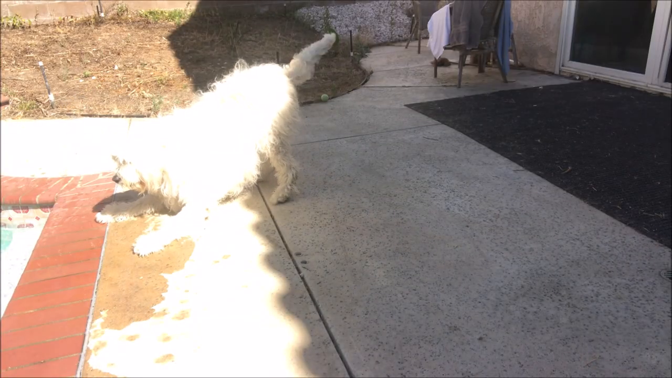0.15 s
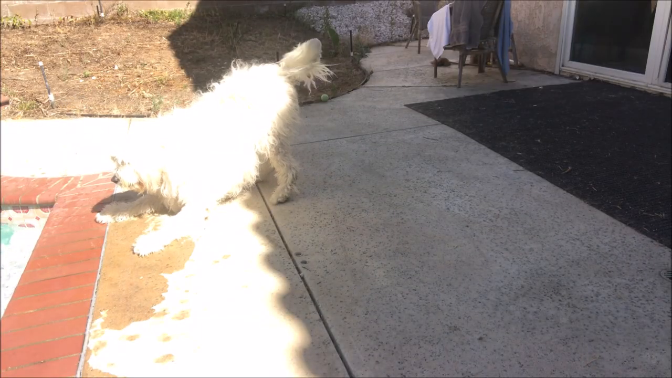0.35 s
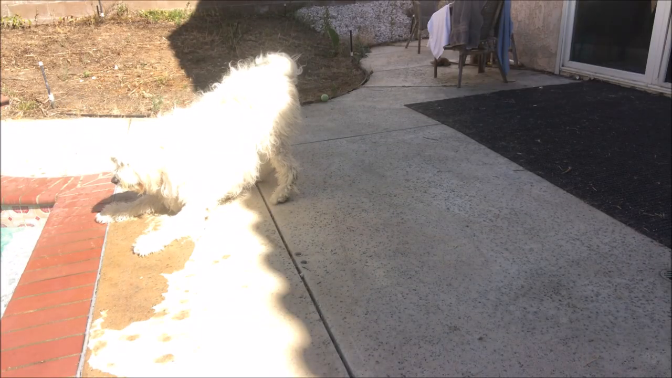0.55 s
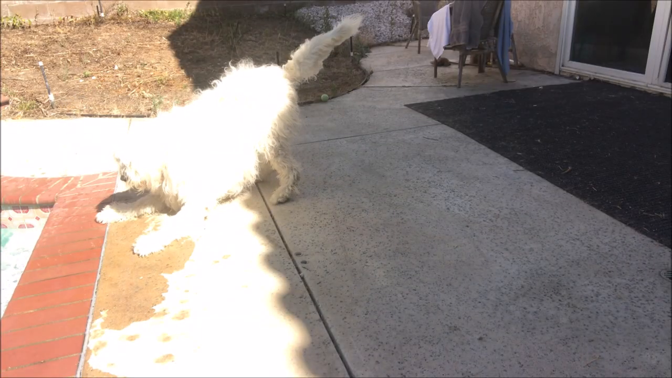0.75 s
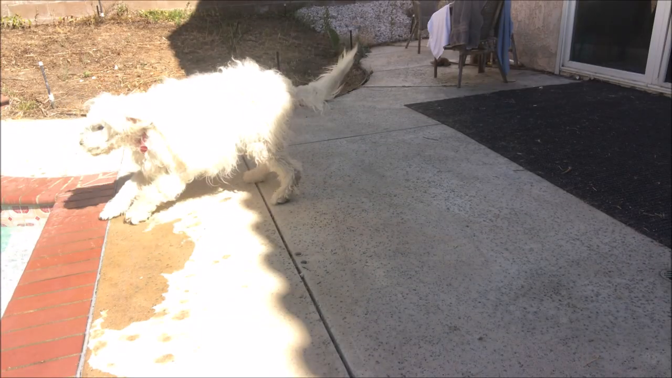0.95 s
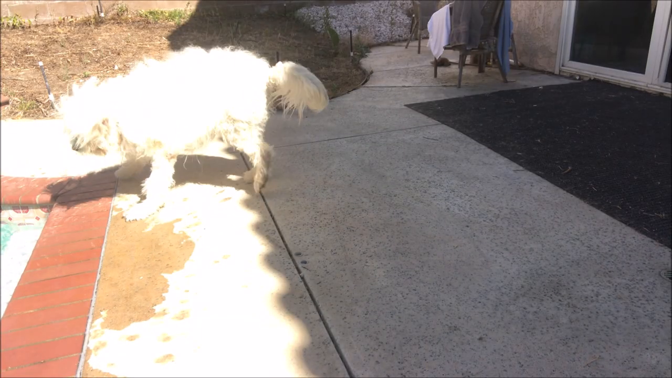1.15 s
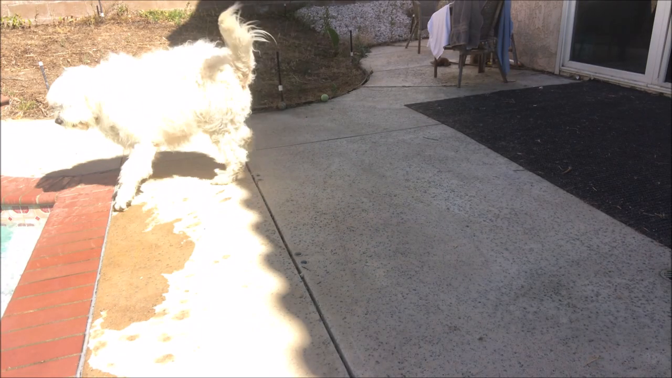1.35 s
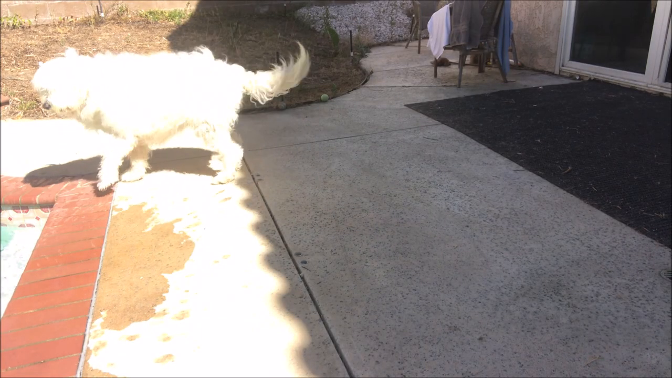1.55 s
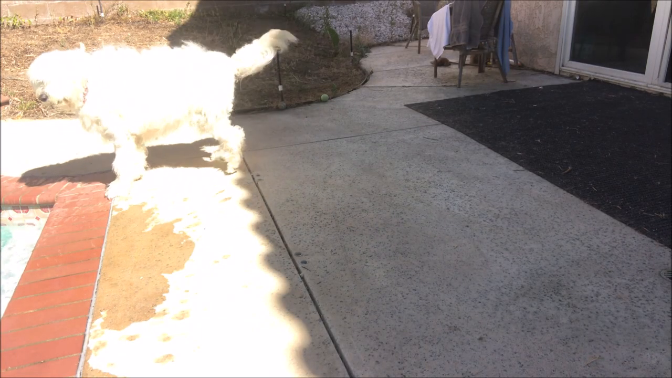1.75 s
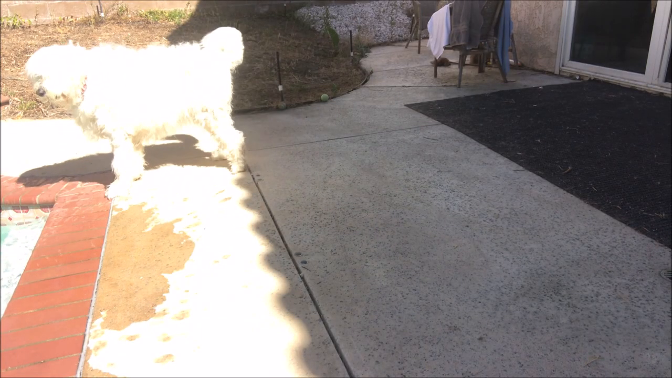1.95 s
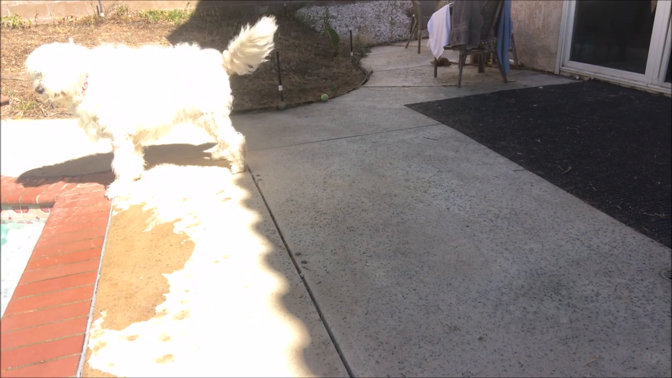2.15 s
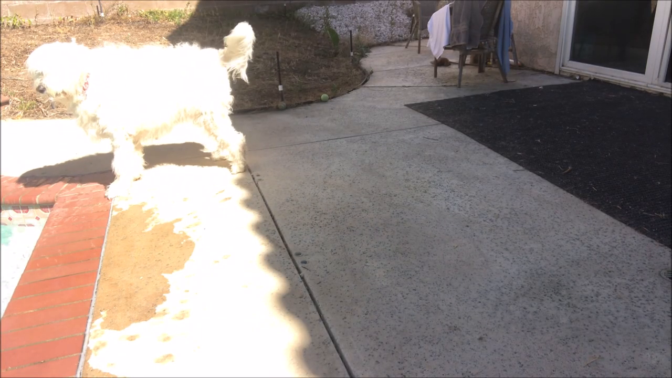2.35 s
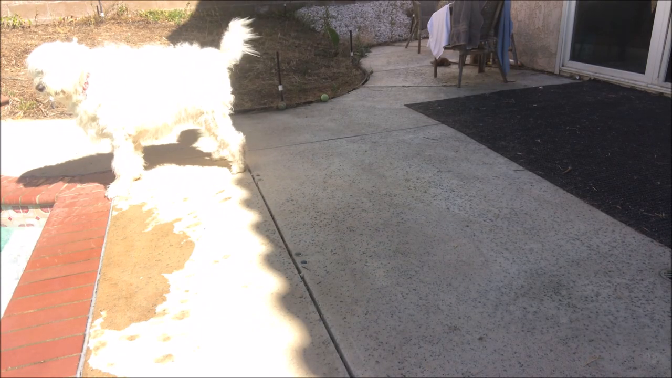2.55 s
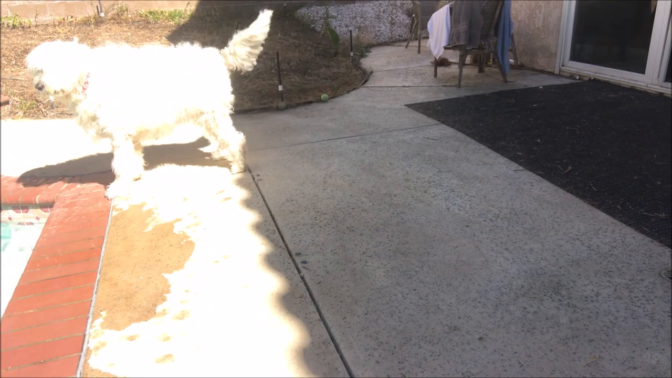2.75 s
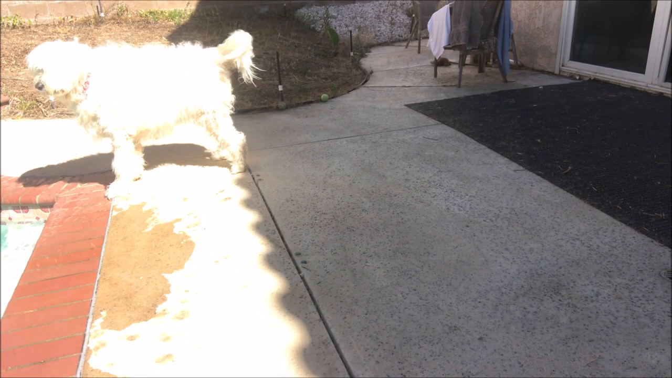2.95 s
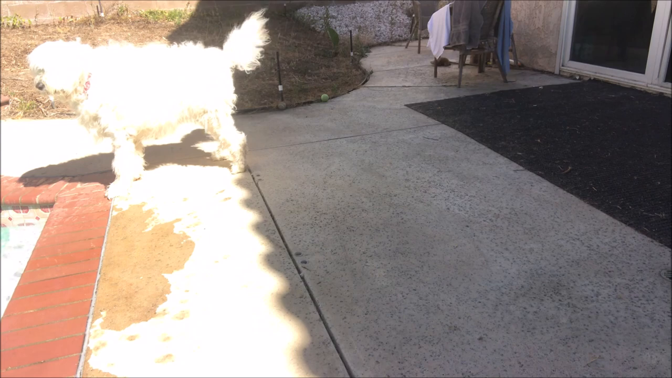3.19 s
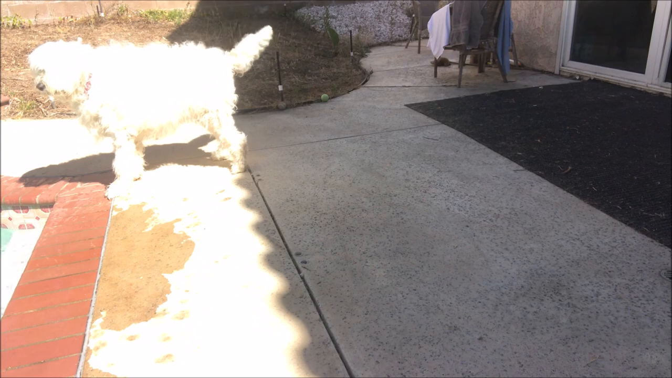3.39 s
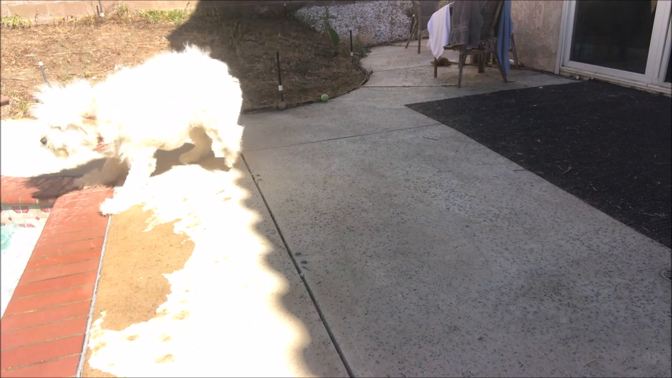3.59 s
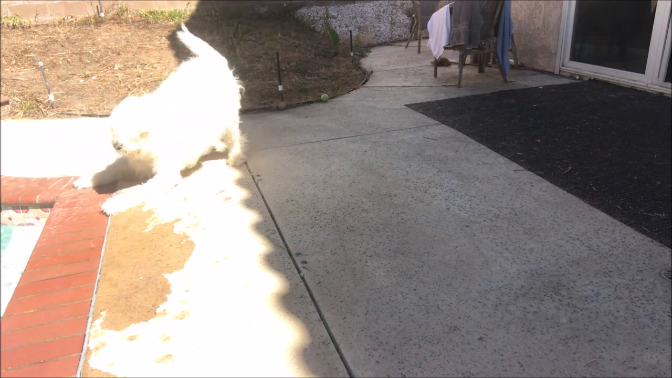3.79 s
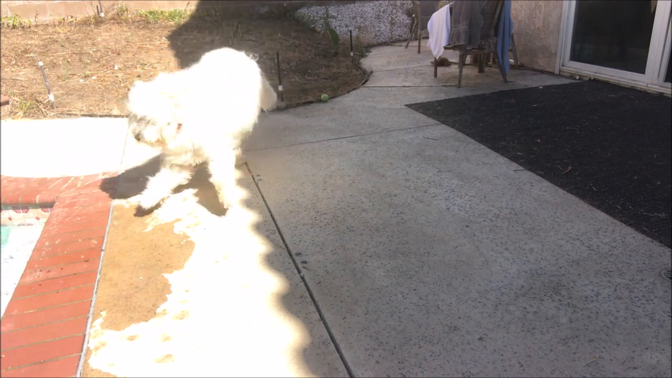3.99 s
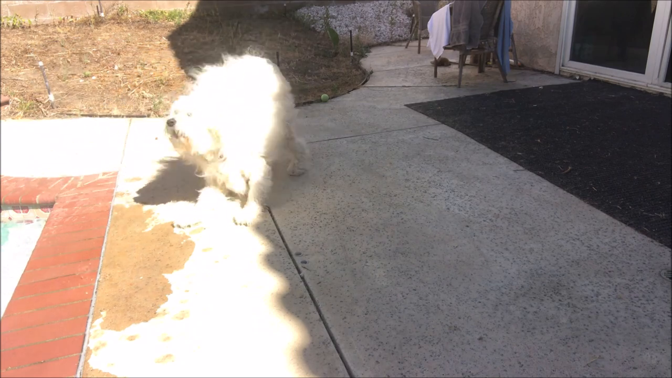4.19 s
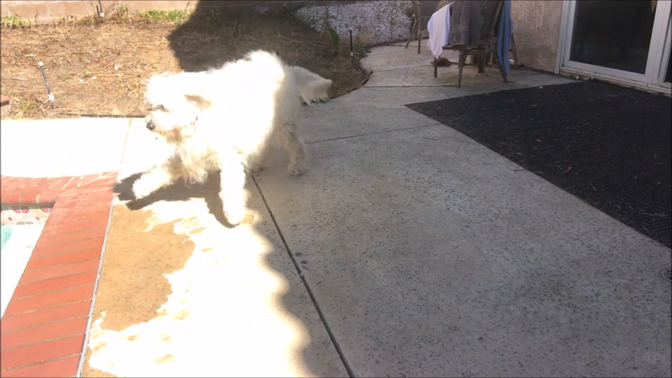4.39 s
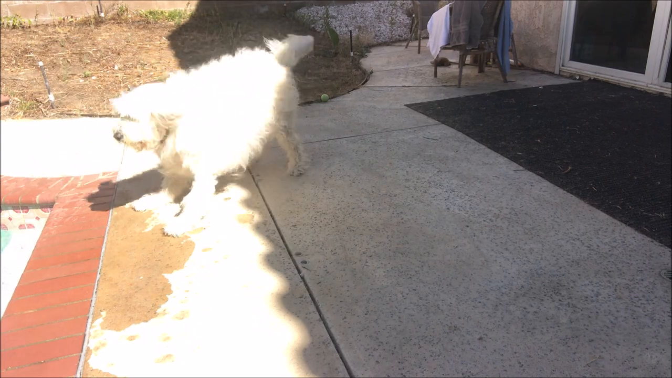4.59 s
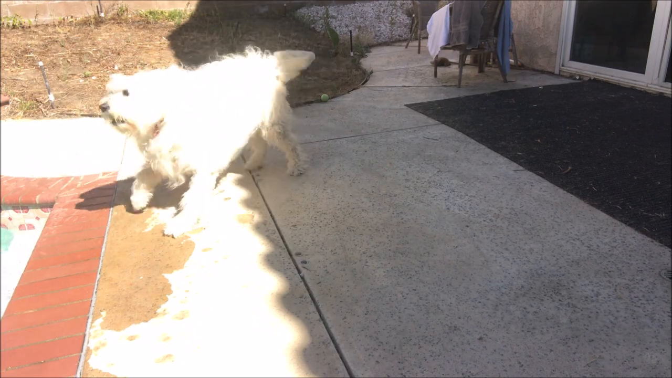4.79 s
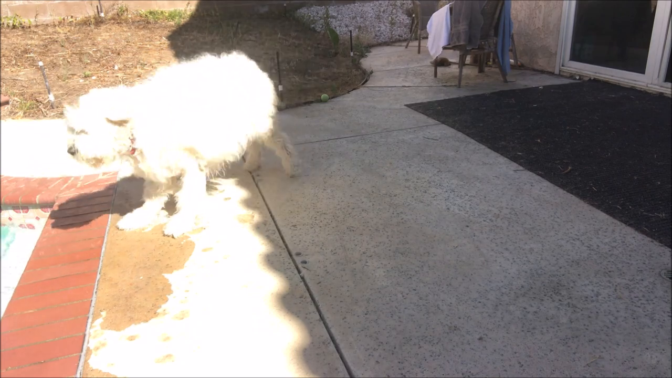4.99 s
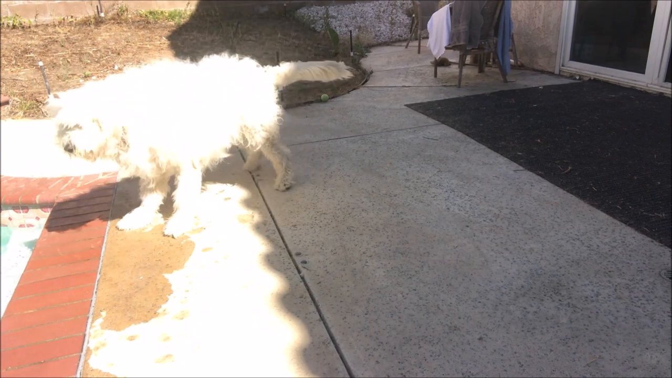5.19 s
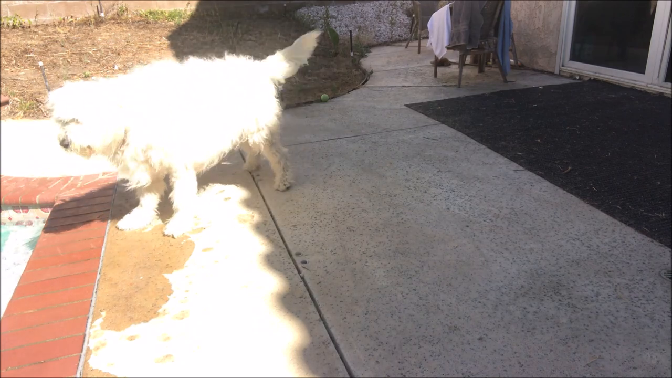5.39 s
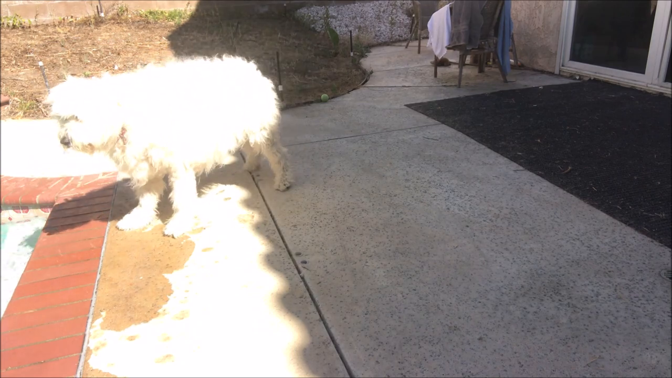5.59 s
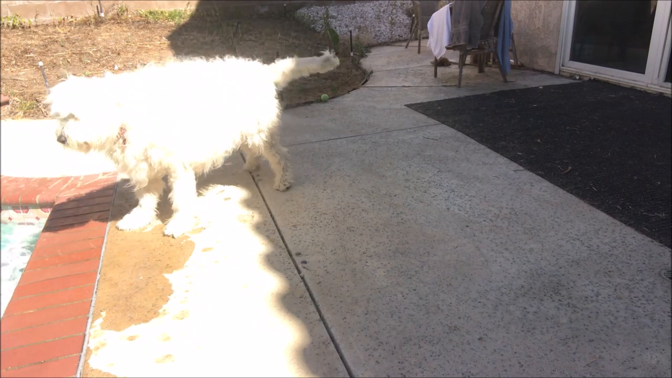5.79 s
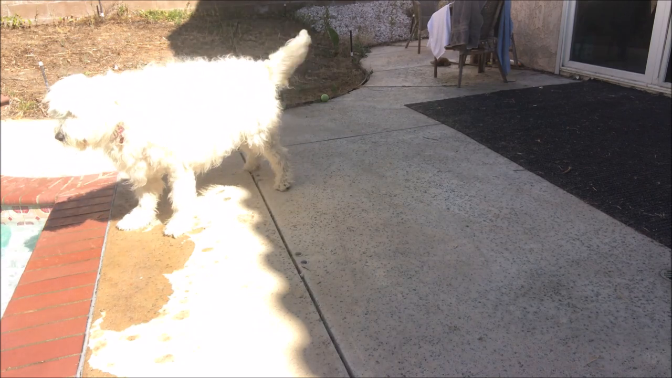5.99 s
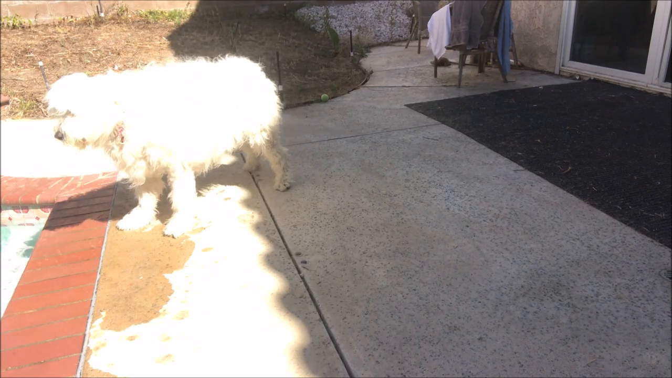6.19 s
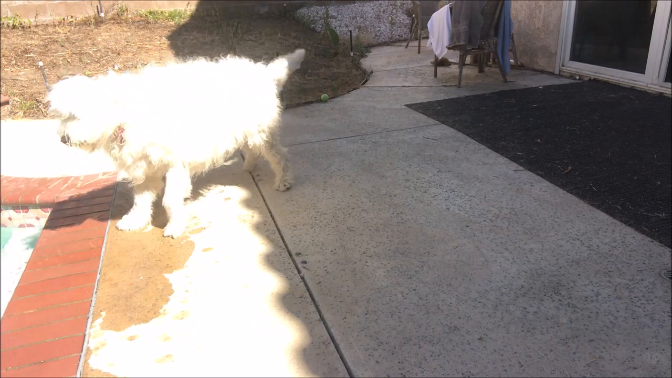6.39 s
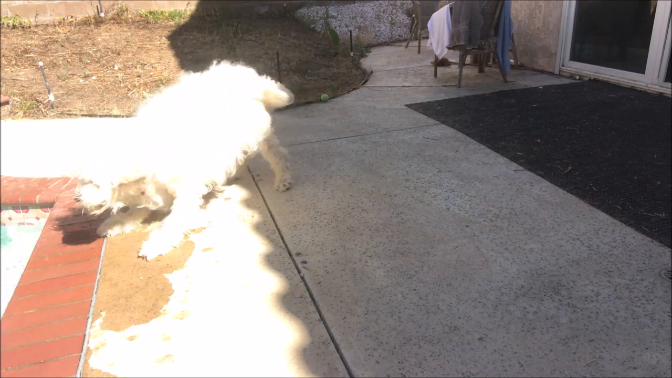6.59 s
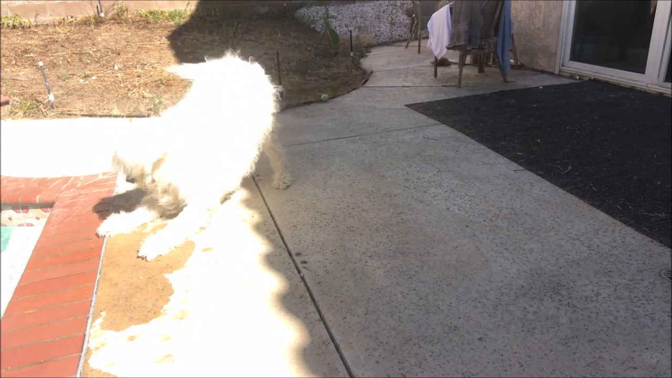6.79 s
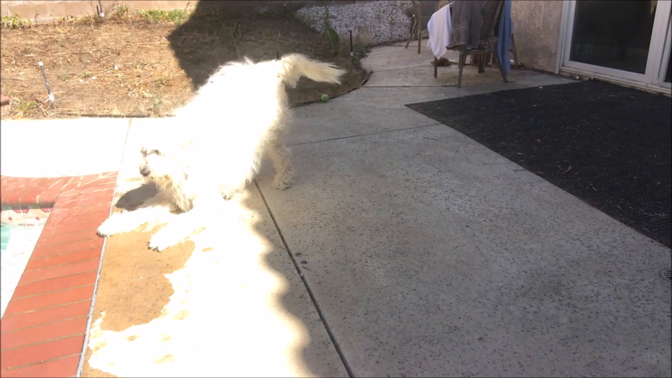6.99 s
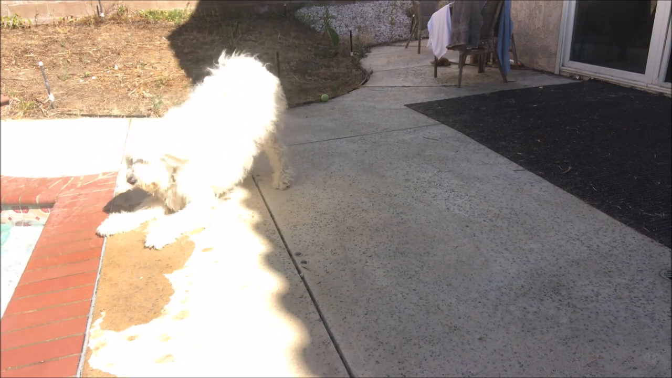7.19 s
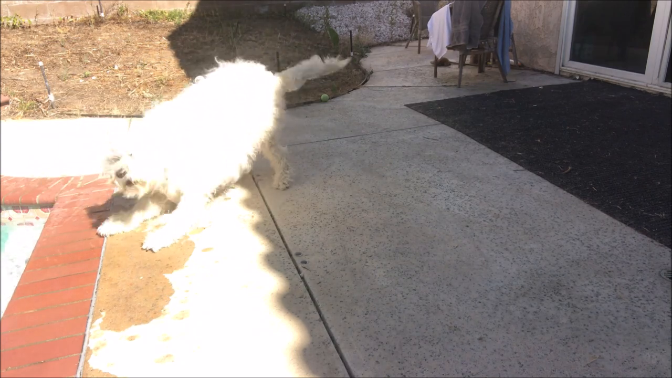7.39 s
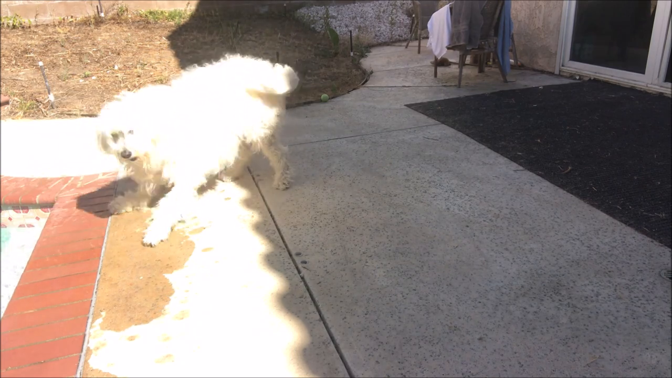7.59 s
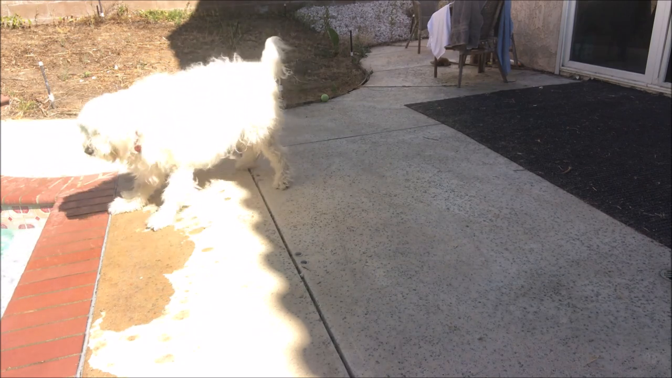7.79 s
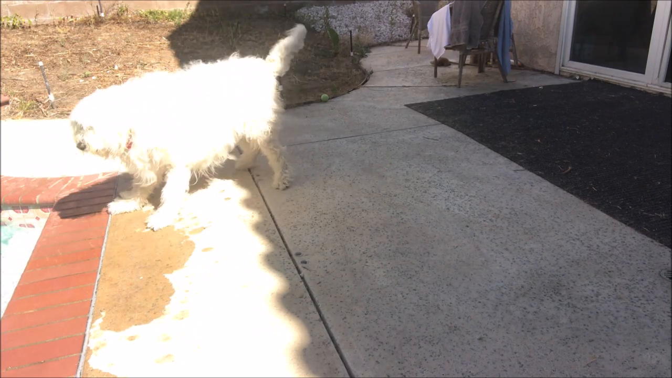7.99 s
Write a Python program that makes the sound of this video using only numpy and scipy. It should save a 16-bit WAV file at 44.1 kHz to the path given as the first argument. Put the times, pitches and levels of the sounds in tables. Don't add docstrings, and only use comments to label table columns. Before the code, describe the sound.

Water laps and fizzes at a pool edge with small drips, then a large dog gives one sharp bark and a breathy huff. After a pause come three barks in a quick run, over a bigger slosh with gurgles and plops. Two more separate barks follow, with a rough growling intake of breath between them. The microphone is outdoors near the dog; house walls return short echoes over faint wind and distant hiss.

```python
import sys
import numpy as np
from scipy import signal
from scipy.fft import rfft, irfft, next_fast_len
from scipy.io import wavfile
from scipy.ndimage import uniform_filter1d, map_coordinates

SR = 44100
rng = np.random.default_rng(int(sys.argv[2]) if len(sys.argv) > 2 else 0)


def undo_db(level):
    steps = np.asarray(level, float) / 20
    return 10 ** steps


def put_to_file(sound):
    columns = np.atleast_2d(sound).T
    safe = np.clip(columns, -1, 1)
    whole_steps = np.round(safe * 32767)
    wavfile.write(sys.argv[1], SR, whole_steps.astype(np.int16))


N = 354999
T = np.arange(N) / SR


def unit(x):
    return x / np.sqrt(np.mean(x ** 2) + 1e-20)


def along(points, hz):
    f, v = np.transpose(points)
    return np.interp(np.log(hz + 1), np.log(f + 1), v)


def curves(rows, t=T):
    s, *cols = np.transpose(rows)
    return [np.interp(t, s, c) for c in cols]


def wobble(rate, size=N):
    knots = rng.standard_normal(int(size * rate / SR) + 4)
    return map_coordinates(knots, [np.arange(size) * rate / SR])


def filtered(x, response):
    m = next_fast_len(len(x) + 8192)
    hz = np.fft.rfftfreq(m, 1 / SR)
    return irfft(rfft(x, m) * response(hz), m)[:len(x)]


def noise(spectrum, size=N):
    return unit(filtered(rng.standard_normal(size), lambda hz: undo_db(along(spectrum, hz))))


def resonance(x, hz, width_hz, hold_s=0.014):
    turn = np.exp(2j * np.pi * np.cumsum(hz) / SR)
    pole = np.exp(-np.pi * width_hz / SR)
    y = np.real(signal.lfilter([1], np.poly([pole, pole, pole]), x / turn) * turn)
    return y / np.sqrt(np.abs(uniform_filter1d(y ** 2, int(hold_s * SR))) + 1e-12)


def fade(t, in_s, out_s):
    rising = np.clip((t - t[0]) / in_s, 0, 1)
    return rising * np.clip((t[-1] - t) / out_s, 0, 1)


def add(track, s, x):
    part = track[round(s * SR):][:len(x)]
    part += x[:len(part)]


def dog():
    # time in seconds, pitch in Hz.
    pitches = [
        [(.97, 305), (.99, 427.2), (1.01, 447.9), (1.035, 388), (1.06, 428), (1.135, 320.4)],
        [(3.615, 140.6), (3.68, 356.5), (3.75, 379), (3.805, 360)],
        [(4.25, 143.8), (4.295, 308.2), (4.325, 357.1), (4.365, 380.6), (4.39, 359.3), (4.43, 365)],
        [(4.835, 117.3), (4.91, 311.2), (4.94, 311.4), (4.965, 388.2), (4.99, 404.6), (5.045, 309)],
        [(6.545, 142.2), (6.57, 293.8), (6.59, 350.9), (6.635, 388.6), (6.685, 384.2), (6.7, 312), (6.725, 335)],
        [(7.36, 140.3), (7.41, 327.8), (7.465, 401.7), (7.5, 410.4), (7.52, 347), (7.55, 297)],
    ]
    # time in seconds, effort in dB.
    efforts = [
        [(.97, -51.5), (.99, -23), (1.01, -8.5), (1.035, -11.5), (1.06, -10.5), (1.085, -24), (1.135, -26)],
        [(3.615, -56.5), (3.645, -21), (3.68, -13), (3.7, -11), (3.725, -11.5), (3.75, -26), (3.805, -20)],
        [(4.25, -40.5), (4.275, -22), (4.295, -11), (4.325, -9), (4.35, -13), (4.365, -9), (4.39, -19.5),
         (4.43, -36)],
        [(4.835, -57), (4.87, -27.5), (4.91, -10.5), (4.95, -11.5), (4.99, -7), (5.015, -21), (5.045, -34)],
        [(6.545, -52), (6.57, -20), (6.59, -6.5), (6.635, -10.5), (6.66, -13), (6.672, -20), (6.685, -10),
         (6.7, -30), (6.725, -42.5)],
        [(7.36, -50.5), (7.395, -23.5), (7.41, -12.5), (7.445, -11), (7.465, -9.5), (7.48, -16.5), (7.5, -11),
         (7.52, -23.5), (7.55, -22.5)],
    ]
    # time in seconds, mouth over throat in dB.
    tongues = [
        [(.99, -4), (1.01, -11), (1.035, -4), (1.135, 0)],
        [(3.62, -19.5), (3.645, 3.5), (3.68, -1.5), (3.725, 14.5), (3.805, -31.5)],
        [(4.25, 10.5), (4.295, -6), (4.325, 6.5), (4.35, -7), (4.365, 9.5), (4.39, -4.5)],
        [(4.87, -10), (4.91, -10.5), (4.95, -5), (4.99, -18.5), (5.015, -3)],
        [(6.59, -16.5), (6.635, -5), (6.66, -1), (6.68, 21.5), (6.7, -22.5)],
        [(7.395, 9.5), (7.41, 5), (7.445, 10), (7.465, -0.5), (7.485, 10), (7.5, 9), (7.52, -20), (7.55, 8.5)],
    ]
    # fullest moment in seconds, level in dB,
    # catch in seconds, its depth in dB, its half length in seconds.
    chests = [(1.01, -12, 1.035, 4.5, 0.02), (3.725, -15.5, 3.69, 1.5, .02),
              (4.331, -13.5, 4.36, 11.5, 0.01), (4.958, -15, 4.91, 7.5, 0.017),
              (6.647, -13.5, 6.67, 25.5, 0.014), (7.466, -8.5, 7.49, 36.5, .02)]
    # half shut in seconds, throat shut in Hz, mouth wide in Hz,
    # muzzle wide in Hz, muzzle shut in Hz.
    jaws = [(1.02, 925, 1370, 2305, 1990), (3.73, 837, 1231, 2300, 1757), (4.321, 875, 1260, 2280, 1943),
            (4.963, 752, 1592, 2373, 2220), (6.614, 864, 1190, 1800, 2284), (7.431, 836, 1664, 1830, 2390)]
    # settled in seconds, noise share from 0 to 1.
    settles = [(1.02, .57), (3.72, .36), (4.32, .36), (4.97, .12), (6.59, .25), (7.45, .27)]
    # muzzle wide, muzzle shut, rasp wide, rasp shut, all in dB against the effort.
    snarls = [(-12, -24, 1, -5.5), (-12, -23, -1, 2.5), (-8.5, -21, 1.5, 1.5), (-14, -24.5, -2.5, -1),
              (-11.5, -23, -1.5, -3), (-11, -22.5, -1.5, 1)]
    # four starts in Hz, four ends in Hz, four levels in dB
    lip_moves = [
        [(3600, 4600, 5500, 6450), (3950, 4850, 5850, 6200), (1.5, -1.5, 1.5, -1.5)],
        [(3100, 4000, 5200, 6000), (4000, 4800, 6100, 6800), (1.5, -1.5, 1.5, 1.5)],
        [(3900, 4500, 4950, 6300), (3500, 4700, 5450, 5800), (-3, -1.5, 1.5, 1.5)],
        [(3400, 4800, 5650, 6350), (4050, 4800, 5250, 6050), (-1.5, -1.5, 1.5, 1.5)],
        [(3650, 3900, 5400, 6300), (3300, 4350, 5400, 6300), (-1.5, 1.5, -1.5, -1.5)],
        [(4150, 4600, 5500, 6600), (3700, 5250, 5400, 6200), (-1.5, 1.5, -1.5, -1.5)],
    ]
    # start in seconds, level in dB.
    puffs = [(1.111, -45), (3.799, -50), (4.4, -41), (5.03, -48), (6.698, -43), (7.518, -34.5)]
    # time in seconds, breath in dB, chest in dB over the breath.
    huff = [
        (1.53, -39.5, -2.5),
        (1.626, -34, -20.5),
        (1.82, -51, -31),
    ]
    gasp = [
        (6.88, -35.5, 6),
        (6.918, -41.5, 1),
        (7.29, -49, -0.5),
    ]
    # resonance in Hz, width in Hz, level in dB.
    huff_tract = [(367, 120, -8.5), (970, 63, 6.5), (1260, 210, 2.5), (2270, 220, -6.5), (3220, 270, -18.5),
                  (4420, 330, -23), (5300, 430, -28)]
    gasp_tract = [(1500, 350, 5), (1910, 290, 4), (3080, 180, -5.5), (3900, 610, -3), (4350, 1540, -4),
                  (5640, 1300, -13.5)]
    # frequency in Hz, level in dB.
    huff_chest = [(40, -31.5), (90, 2.5), (250, -11), (500, -21), (900, -63)]
    gasp_chest = [(40, -33.5), (80, 1.5), (200, -0.5), (550, -2.5), (800, -37.5), (1500, -68.0)]

    out = np.zeros(N)
    for call in zip(pitches, efforts, tongues, chests, jaws, settles, snarls, lip_moves):
        start_s = call[0][0][0]
        add(out, start_s, bark(*call))
    for s, db in puffs:
        add(out, s, undo_db(db) * rasp(1900, 1) * fade(T[:1900], 0.0042, 0.0063))
    out = signal.sosfilt(signal.butter(3, 150, "high", fs=SR, output="sos"), out)
    add(out, huff[0][0], breath(huff, huff_tract, flutter_hz=93.76, depth=2.1, chest=huff_chest))
    add(out, gasp[0][0], breath(gasp, gasp_tract, flutter_hz=104.6, depth=1.9, chest=gasp_chest))
    return out


def bark(pitch, push, tongue, ribs, jaw, settle, snarl, lips):
    t = np.arange(pitch[0][0], pitch[-1][0], 1 / SR)
    n = len(t)
    (pitch_hz,), (effort_db,), (tongue_db,) = curves(pitch, t), curves(push, t), curves(tongue, t)
    shut_s, throat_hz, mouth_hz, wide_hz, shut_hz = jaw
    jaw_close_s = 0.01
    wide = 1 / (1 + np.exp((t - shut_s) / jaw_close_s))

    def between(shut, open_):
        return shut + (open_ - shut) * wide

    throat_db = effort_db - np.maximum(tongue_db, 0)
    mouth_db = effort_db + np.minimum(tongue_db, 0)
    muzzle_db = effort_db + between(snarl[1], snarl[0])

    settled_s, share = settle
    ragged = np.interp(t, [t[0], settled_s, t[-1] - 0.04, t[-1]], [0.8, share, share, 0.7])
    cycle = 2 * np.pi * np.cumsum(pitch_hz * (1 + 0.05 * ragged * wobble(150, size=n))) / SR
    pulses = sum(np.cos(k * cycle) for k in range(1, 9))
    pulses = unit(pulses * undo_db(3 * ragged * wobble(200, size=n)))
    clicks = sum(np.cos(k * cycle) for k in range(7, 24))
    clicks = unit(clicks * undo_db(4 * wobble(200, size=n)))
    gate = 1 + 1.58 * np.cos(cycle)

    def source(share):
        return np.sqrt(1 - share) * pulses + 3.1 * np.sqrt(share) * gate * rng.standard_normal(n)

    chest_hz = np.clip(391 + 70 * wide, pitch_hz, 2.3 * pitch_hz)
    chest_db = chest_level(t, *ribs)
    chest = undo_db(chest_db) * resonance(source(ragged ** 3), chest_hz, 260)
    throat = undo_db(throat_db) * resonance(source(ragged ** 2), throat_hz + 94 * wide, 340)
    mouth = undo_db(mouth_db) * resonance(source(ragged ** 2), between(1137, mouth_hz), 409)
    muzzle = undo_db(muzzle_db) * resonance(source(ragged ** 1.2), between(shut_hz, wide_hz), 390)

    effort = np.sqrt(undo_db(2 * throat_db) + undo_db(2 * mouth_db) + undo_db(2 * muzzle_db + 13.5))
    air_db = -22.5 + 0.31 * muzzle_db + between(snarl[3], snarl[2])
    air = undo_db(air_db) * effort ** 0.43 * rasp(n, gate, lips, clicks)
    low_pitch = np.clip(2 - 2 * pitch_hz / 290, 0, 1)
    growl = undo_db(chest_db - 7) * low_pitch * np.cos(cycle)
    return (growl + chest + throat + mouth + muzzle + air) * fade(t, 0.0031, 0.033)


def chest_level(t, full_s, full_db, catch_s, catch_db, half_s):
    fill_db_per_s, sag_db_per_s = 106.5, 113
    swell_db = np.where(t < full_s, fill_db_per_s * (t - full_s), sag_db_per_s * (full_s - t))
    onset_db = -22 * np.exp(-(t - t[0]) / 0.012)
    return full_db + swell_db + onset_db - catch_db * np.exp(-((t - catch_s) / half_s) ** 2)


def rasp(n, gate, lips=None, clicks=0):
    # resonance in Hz, width in Hz, level in dB.
    rest = [(2800, 240, -9), (3728, 650, -1), (4647, 400, -3), (5400, 480, -1.5), (6276, 520, -2),
            (7000, 380, -11.5), (8240, 430, -16)]
    # frequency in Hz, level in dB per Hz.
    hiss = [(1800, -39), (2700, -3), (4000, -4.5), (6500, -5), (7800, -11), (10500, -16), (13000, -13),
            (15800, -21)]
    voiced = 0.5
    tract = [[hz + np.zeros(n), width_hz, db] for hz, width_hz, db in rest]
    for band, start_hz, end_hz, db in zip(tract[1:], *(lips or [[], [], []])):
        band[0] = np.linspace(start_hz, end_hz, n)
        band[2] += db
    bands = np.zeros(n)
    for hz, width_hz, db in tract:
        drive = (1 - voiced) * gate * rng.standard_normal(n) + voiced * clicks
        sliding_hz = hz * (1 + 0.022 * wobble(45, size=n))
        flicker = undo_db(db + 4.5 * wobble(75, size=n))
        bands += flicker * resonance(drive, sliding_hz, width_hz, hold_s=0.03)
    return unit(unit(bands) + 0.3 * gate * undo_db(3 * wobble(70, size=n)) * noise(hiss, size=n))


def breath(rows, tract, flutter_hz, depth, chest):
    t = np.arange(rows[0][0], rows[-1][0], 1 / SR)
    n = len(t)
    air_db, chest_db = curves(rows, t)
    cycle = np.cumsum(flutter_hz * (1 + 0.35 * wobble(40, size=n))) / SR % 1
    flap = np.exp(-depth * cycle * np.exp(-(t - t[0]) / 0.18)) * undo_db(1.9 * wobble(70, size=n))

    def shape(f):
        total = 0
        for k, (c, w, db) in enumerate(tract):
            total = total + (-1) ** k * undo_db(db) * 1j * f * w / (c * c - f * f + 1j * f * w)
        return total

    air = unit(filtered(flap * rng.standard_normal(n), shape))
    body = unit(flap ** 0.5 * noise(chest, size=n))
    return undo_db(air_db) * (air + undo_db(chest_db) * body) * fade(t, 0.006, 0.041)


def water():
    # frequency in Hz, level in dB per Hz.
    fizz_colour = [(710, -31.5), (1200, 1.5), (3760, -6), (4770, -12), (5730, -6.5), (10400, -21.5),
                   (14000, -17), (15800, -28.5)]
    slop_colour = [(47, -40.5), (80, -6), (333, -2.5), (790, 0), (2500, -14), (3250, -41), (5500, -120)]
    # start in seconds, peak in dB, starting pitch in Hz.
    single = [(0.2184, -37, 1230), (0.3122, -36, 3140), (0.3481, -36.5, 3580), (0.4319, -32.5, 3850),
              (0.4875, -37, 1501), (0.7933, -33.5, 3380), (2.1242, -53, 2410), (2.2368, -37.5, 1010),
              (5.441, -38, 2220), (5.692, -45, 1670), (5.9389, -40.5, 1867), (5.9588, -41, 1333),
              (6.0539, -40.5, 1485), (7.9964, -31.5, 1320)]
    specks = [(.4509, -32.5, 3620), (.5185, -34, 4170), (.7738, -33.5, 5400), (2.126, -51, 4070),
              (2.201, -45, 3900), (2.233, -50, 3800), (2.276, -53, 5300), (2.463, -43, 3720),
              (2.5681, -53, 7050), (4.6106, -28.5, 4170), (4.6914, -32, 5050), (4.7272, -14.5, 2250),
              (5.9932, -41.5, 5100), (6.459, -46.5, 5780), (7.2404, -38, 5840)]
    glugs = [(0.709, -36, 698), (4.063, -22.5, 347), (4.085, -23.5, 543), (4.119, -30.5, 396),
             (4.754, -32, 563), (5.6, -45, 780), (5.64, -48, 800), (5.675, -51, 780), (6.904, -24.5, 541)]
    plops = [
        (2.206, -51, 816),
        (5.536, -27, 610),
    ]
    gurgles = [(3.945, -36, 330), (3.965, -31, 220), (3.985, -32.5, 270), (4.0, -33, 300), (4.03, -31, 310),
               (4.048, -31, 270), (4.1, -31, 180), (4.112, -31, 240), (4.122, -31, 200), (4.133, -31, 140),
               (4.155, -33, 210), (4.172, -32, 150), (4.187, -33.5, 180), (4.58, -40, 230),
               (4.61, -38, 160), (4.64, -38, 120), (4.67, -40.5, 240)]
    patter = [(0.0327, -39, 1040), (0.138, -43, 1480), (0.2023, -41.5, 1290), (0.2682, -41, 1780),
              (0.3274, -35, 1530), (0.3708, -35, 3040), (0.6445, -39, 1130), (0.6665, -37, 1070),
              (0.7251, -36, 2830), (0.8708, -36, 2460), (2.2144, -41, 934), (2.2494, -48, 1210),
              (2.2644, -47, 1310), (3.5874, -45, 2500), (3.5922, -41, 988), (4.8369, -29.5, 956),
              (7.9957, -33, 1240)]
    # start in seconds, peak in dB.
    ticks = [(0.419, -38.5), (0.5433, -32.5), (0.5477, -32.5), (0.567, -37), (0.599, -48.5), (0.8303, -38),
             (0.882, -35.5), (1.7605, -33), (1.7746, -49), (3.591, -39), (4.4971, -30.5), (4.568, -31.5),
             (4.635, -31.5), (4.7541, -24.5), (4.768, -25), (4.7895, -43.5), (5.133, -36.5), (5.5339, -36),
             (5.6913, -34), (6.622, -27), (6.652, -33), (6.721, -31), (6.8941, -47), (7.3253, -47),
             (7.651, -29), (7.7569, -39), (7.8314, -30), (7.996, -27), (8.0369, -42)]

    fizzing, slopping = sloshing()
    u = rng.random((4000, 5))
    hz = 3200 * np.exp(1.05 * (u[:, 1] + u[:, 2] - 1))
    size_db = np.minimum(-4 * np.log(u[:, 3]), 4)
    life_s = (1.8 + 12 * u[:, 4] ** 3) / hz
    crackle = unit(bubbles(u[:, 0] * N / SR, size_db, hz, 0.3 + 0 * hz, life_s, size=300))
    lump = wobble(28)
    fizz = 0.88 * noise(fizz_colour) * undo_db(3.7 * wobble(130)) + 0.55 * crackle
    slop = noise(slop_colour) * undo_db(3.6 * wobble(40))
    out = undo_db(1.2 * lump) * (fizzing * fizz + slopping * slop)

    out += drops(single, rise=0.11, life_s=0.0037)
    out += drops(specks, rise=0.11, life_s=0.0026)
    out += drops(glugs, rise=0.1, life_s=0.015)
    out += drops(plops, rise=1.0, life_s=0.027)
    out += drops(gurgles, rise=0.15, life_s=0.016)
    out += drops(patter, rise=0.099, life_s=0.003)
    for s, db in ticks:
        click = signal.lfilter([1, -0.9], [1, -0.75, 0.2], rng.standard_normal(400))
        add(out, s, undo_db(db - 8.5 - 60 * T[:400] / 0.007) * click)
    return out


def sloshing():
    # crest in seconds, fizz in dB, slop in dB over the fizz,
    # seconds to swell by 20 dB, seconds to sink by 20 dB.
    sloshes = [(.03, -54, -0.2, -0.5, 0.33), (.34, -52, -2.5, .12, 0.24), (.45, -50, -5.5, 0.19, 0.08),
               (.59, -51, -0.4, 0.22, 0.29), (.8, -53, 2.5, 0.38, .6), (.96, -54, 1.5, 0.35, .9),
               (1.3, -60.5, 5.5, 0.7, 0.73), (2.23, -63.5, 5, 0.1, 0.32), (3.83, -43, 8, .11, .3),
               (4.03, -40.5, 5.5, .2, 0.31), (4.12, -38, 1.5, .2, 0.29), (4.23, -36, -7.5, .2, 0.28),
               (4.6, -44, -4, 0.28, 0.57), (4.77, -47, -2.5, .2, 0.05), (5.1, -56, 1.5, 0.4, 1.37),
               (5.45, -61, -4, .3, 0.5), (6.52, -63.5, -3.5, 0.3, 0.7), (6.8, -57, 10, .3, .25),
               (7.32, -61.5, -15, .5, .7), (7.65, -61.5, 9.5, 0.25, .4), (7.84, -56, -9, 0.45, 0),
               (8.045, -48.5, -3, 0.06, .25)]
    s, db, slop_db, swell_s, sink_s = np.transpose(sloshes)[:, :, None]
    t = T[::64]
    below_crest_db = 20 * np.where(t < s, (s - t) / swell_s, (t - s) / sink_s)
    power = undo_db(2 * (db - below_crest_db))
    fizz = power.sum(0) + undo_db(2 * -81)
    slop = (power * undo_db(2 * slop_db)).sum(0) + undo_db(2 * -68)
    return np.interp(T, t, np.sqrt(fizz)), np.interp(T, t, np.sqrt(slop))


def drops(rows, rise, life_s):
    s, db, hz = np.transpose(rows)
    return bubbles(s, db, hz, rise + 0 * s, life_s + 0 * s, size=2048)


def bubbles(s, db, hz, rise, life_s, size):
    t = np.arange(size) / SR
    u = t / life_s[:, None]
    tone = np.sin(2 * np.pi * hz[:, None] * t * (1 + rise[:, None] * u / 2))
    wave = tone * np.exp(-2.5 * u ** 2) * (1 - np.exp(-12 * u))
    at = (s * SR).astype(int)[:, None] + np.arange(size)
    return np.bincount(at.ravel(), (undo_db(db)[:, None] * wave).ravel(), N + size)[:N]


def yard(x):
    # frequency in Hz, time to fall 60 dB in seconds.
    decay = [(150, 1), (400, 0.44), (1000, 0.93), (1700, .7), (2700, 0.5), (6000, 0.94), (14000, 0.4)]
    # echo delay in seconds, level in dB.
    walls = [(.006, -19.5), (.017, -22), (.031, -18), (.075, -23.5), (.11, -27), (0.143, -29), (.19, -32)]
    scatter = 0.078
    near, out = T[:SR // 4], np.zeros(N)
    stretch = 60000
    for start in range(0, N, stretch):
        early = np.zeros(len(near))
        for s, db in walls:
            smear = np.exp(-((near - s) / (scatter * s)) ** 2)
            early += undo_db(db) * unit(rng.standard_normal(len(near)) * smear)
        early /= np.sqrt(len(near))
        hz, t, z = signal.stft(rng.standard_normal(SR), SR, nperseg=256)
        tail = signal.istft(z * undo_db(-60 * t / along(decay, hz)[:, None]), SR, nperseg=256)[1]
        answer = undo_db(-24.5) * np.pad(tail / np.linalg.norm(tail), (1500, 0))
        add(answer, 0, early)
        add(out, start / SR, signal.fftconvolve(x[start:start + stretch], answer))
    return out


def outdoors():
    # time in seconds, level in dB.
    gusts = [(0.0, -62), (4.64, -58.5), (5.6, -63.5), (7.15, -58), (7.53, -63), (8.05, -60)]
    # frequency in Hz, level in dB per Hz.
    rumble = [(13, -40.5), (22, -17), (54, -0.5), (124, -13), (146, -17), (200, -23), (260, -56.5),
              (440, -120)]
    air = [(59, -25.5), (100, -0.5), (238, -9.5), (469, -19.5), (522, -10), (605, -19.5), (5500, -33.5),
           (15800, -43)]
    # frequency in Hz, level in dB.
    pump_tones = [(522, -75)]
    # start in seconds, peak in dB, frequency in Hz, life in milliseconds.
    nudges = [(1.569, -38.5, 86.5, 52), (2.04, -43, 50, 57), (5.975, -39.5, 55.8, 83),
              (6.48, -37.5, 60, 70)]
    buffet_db, = curves(gusts)
    pump = np.zeros(N)
    for hz, db in pump_tones:
        level = np.sqrt(2) * undo_db(db + 1.6 * wobble(7.2))
        pump += level * np.sin(2 * np.pi * hz * T + 0.8 * wobble(11))
    s, db, hz, life_ms = np.transpose(nudges)
    wind = undo_db(buffet_db) * unit(undo_db(1.8 * wobble(10)) * noise(rumble))
    wind += bubbles(s, db, hz, 0 * s, life_ms / 1000, size=6000)
    distant = undo_db(-61.5 + 0.58 * wobble(5.8)) * noise(air)
    microphone_hiss = undo_db(-82) * rng.standard_normal(N)
    return distant + pump + wind + microphone_hiss


def scene():
    # frequency in Hz, level in dB.
    bounce = [(200, 1.5), (400, -4), (800, -3), (1200, -1.5), (1700, 4), (2700, 3.5), (4500, -2.5),
              (9000, 3)]
    voice, pool = dog(), water()
    echo = yard(filtered(voice + undo_db(0.5) * pool, lambda hz: undo_db(along(bounce, hz))))
    echo = np.interp(T + 0.00015 * wobble(45), T, echo)
    return (voice + pool + echo + outdoors())[None]


def roll_off(x):
    return signal.sosfilt(signal.butter(12, 15870, fs=SR, output="sos"), x)


def record(dry):
    squeezed = dry / (1 + np.abs(dry) ** 6) ** (1 / 6)
    heard = signal.sosfilt(signal.butter(2, 38, "high", fs=SR, output="sos"), squeezed)
    return roll_off(heard)


dry = scene()
out = record(dry)
put_to_file(out)
```